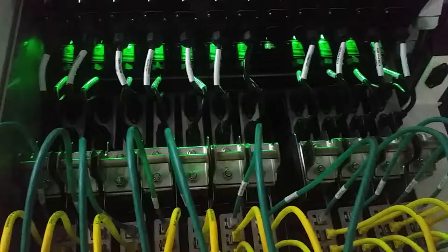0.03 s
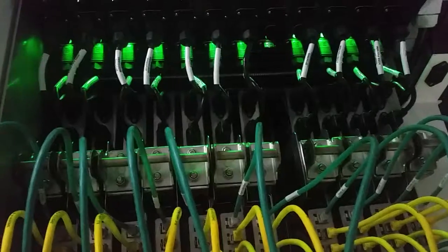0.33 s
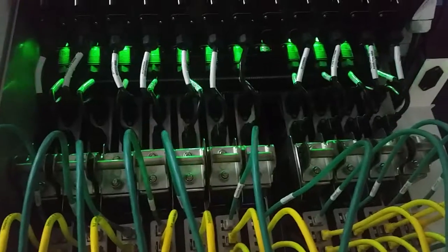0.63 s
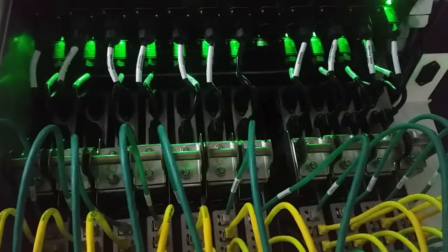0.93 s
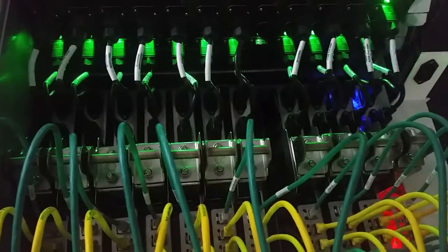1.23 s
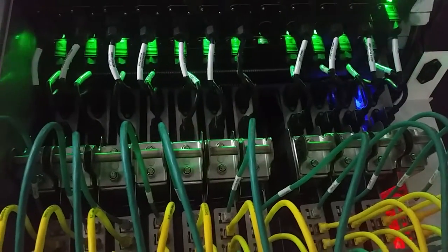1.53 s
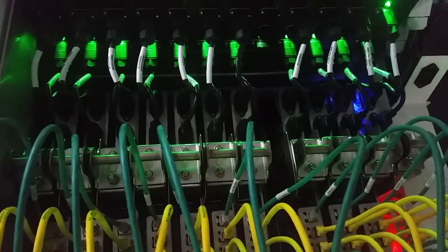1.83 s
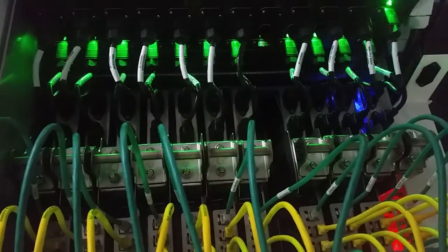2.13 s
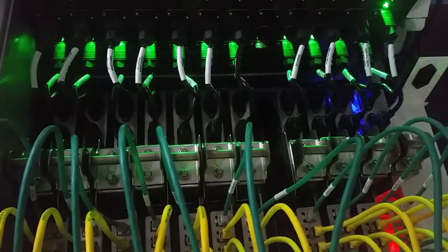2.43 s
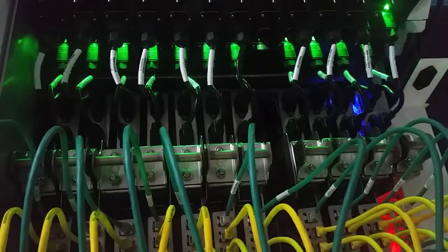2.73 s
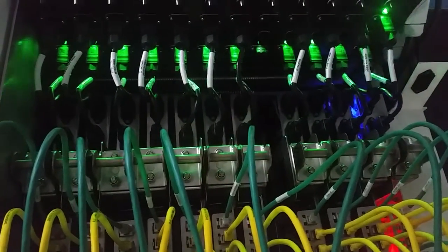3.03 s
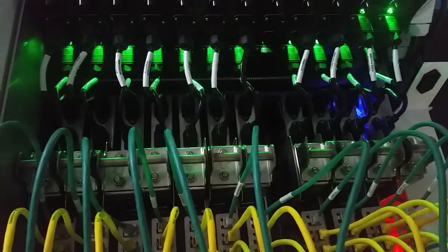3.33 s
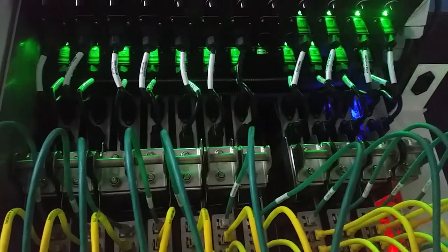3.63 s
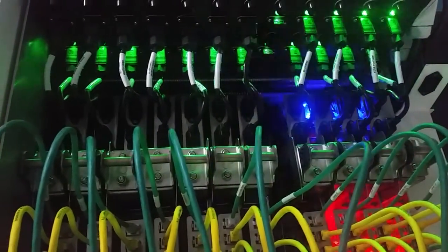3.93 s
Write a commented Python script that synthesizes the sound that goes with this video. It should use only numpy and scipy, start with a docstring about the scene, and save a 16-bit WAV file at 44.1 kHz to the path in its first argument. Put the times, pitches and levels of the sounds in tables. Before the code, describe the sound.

A loud metal clunk of a power switch shakes an equipment cabinet, followed by one relay click and later a quick cluster. The microphone opens with a pop, and server room fans rumble, hiss and whine throughout.

```python
"""Server rack powering up

In a hard-walled server room a heavy contactor slams in, shakes the cabinet and wakes a thin
power-supply whine; small relays clack, one just before it and the rest after. Cooling fans rumble,
hiss and whine throughout. The microphone comes alive with a pop and fades in."""
import sys
import numpy as np
from scipy import signal
from scipy.fft import rfft, irfft, next_fast_len
from scipy.io import wavfile
from scipy.ndimage import map_coordinates

SR = 44100
rng = np.random.default_rng(int(sys.argv[2]) if len(sys.argv) > 2 else 0)


def wav_out(sig):
    """Save sig, one row per channel (or a flat mono array), as 16-bit PCM at SR to the path in sys.argv[1]."""
    wavfile.write(sys.argv[1], SR, np.round(np.clip(np.atleast_2d(sig).T, -1, 1) * 32767).astype(np.int16))


N = 176400  # 4 s


def amp(db):
    """Decibels to gain."""
    return 10 ** (np.asarray(db) / 20)


def unit_rms(x):
    """x scaled to rms 1."""
    return x / np.sqrt(np.mean(x ** 2) + 1e-20)


def curve_at(points, hz):
    """A breakpoint curve read on a log frequency axis."""
    freqs, values = np.transpose(points)
    return np.interp(np.log(hz + 1), np.log(freqs + 1), values)


def since(start):
    """Seconds since start for each sample, zero before it."""
    return np.maximum(np.arange(N) / SR - start, 0)


def pan(db):
    """Left and right gains, db apart; positive leans left."""
    return amp(np.array([[.5], [-.5]]) * db)


def wobble(rate):
    """A smooth random modulator, rate knots a second."""
    return map_coordinates(rng.standard_normal(400), [np.arange(N) * rate / SR], mode="wrap")


def eq(x, response):
    """x filtered by response, a gain for each frequency."""
    size = next_fast_len(N + 8192)
    return irfft(rfft(x, size) * response(np.fft.rfftfreq(size, 1 / SR)), size)[..., :N]


def noise(colour, correlation):
    """Stereo noise of rms 1; the lower the left-right correlation, the wider it sounds."""
    def mid_side_gains(hz):
        width = np.arccos(np.clip(curve_at(correlation, hz), -1, 1)) / 2
        return colour(hz) * np.array([np.cos(width), np.sin(width)])
    mid, side = eq(rng.standard_normal((2, N)), mid_side_gains)
    return unit_rms(np.array([mid + side, mid - side]))


# Colours of the ventilation rumble and the air hiss: f/Hz, relative level/dB
RUMBLE_COLOUR = [(15, -7), (30, -7.5), (42, -5.5), (54, -23), (70, -0.5), (110, 1.5), (135, -6),
                 (156, -1.5), (185, -10.5), (222, -15), (243, -10.5), (290, -15.5), (330, -6.5), (390, -18),
                 (600, -46.5), (1500, -53)]
HISS_COLOUR = [(150, -20), (420, 1), (520, 1.5), (590, 6.5), (660, 3), (740, 5.5), (1100, 0.5),
               (1800, -2.5), (2250, -3.5), (2800, -12.5), (3800, -11.5), (4600, -18.5), (5300, -19.5),
               (6100, -21), (7100, -10.5), (8000, -22), (8800, -22.5), (10300, -46), (12500, -29),
               (16000, -30)]
# Stereo width of the background bed: f/Hz, left-right correlation
BED_CORRELATION = [(30, 1), (110, 1), (250, 0.97), (500, 0.75), (1000, -0.29), (2000, -0.13),
                   (4000, -0.054), (8000, -0.12)]
# Lean of the fan noise: f/Hz, pan/dB
FAN_PAN = [(30, -4), (100, -2), (250, 0.3), (2000, 0.5), (4000, 1.5), (5300, -6), (6300, -4), (7200, 4.5),
           (8700, -5), (12000, 1.5)]
def fan_air():
    """The bed: ventilation rumble and the hiss of air through the racks."""
    rumble = amp(-43) * noise(lambda hz: amp(curve_at(RUMBLE_COLOUR, hz)), BED_CORRELATION)
    hiss = amp(-49.5) * noise(lambda hz: amp(curve_at(HISS_COLOUR, hz)), BED_CORRELATION)
    return eq(rumble + hiss, lambda hz: pan(curve_at(FAN_PAN, hz)))


def whine(partials):
    """Held tones, each wavering slightly in pitch and level."""
    drift_hz, flutter_db, spread_rad = 1.196, 0.6, 0.75
    out = np.zeros((2, N))
    for hz, db, pan_db in partials:
        pitch = hz + drift_hz * wobble(7)
        phase = 2 * np.pi * np.cumsum(pitch) / SR + np.array([[.5], [-.5]]) * spread_rad
        out += pan(pan_db) * amp(db + flutter_db * wobble(9)) * np.sqrt(2) * np.sin(phase)
    return out


# Tones of the fans: f/Hz, level/dB, pan/dB
FAN_PARTIALS = [(111.7, -54, 8.5), (155.7, -57.5, 2), (331, -65.5, 3.5), (435.5, -65, 3), (787, -73, 12),
                (848.6, -67.5, -17.5), (874.8, -52, 1), (1297, -69.5, 10), (1316, -76, 21.5),
                (1700, -61, -1.5), (1766, -71, 10)]
def fan_whine():
    """The running fans hum and whine."""
    return whine(FAN_PARTIALS)


# Whine of the supply: f/Hz, level/dB, pan/dB
SUPPLY_PARTIALS = [(4280, -79, -3), (5135, -78, -6.5)]
# Its narrow sizzle: f/Hz, relative level/dB
SIZZLE_COLOUR = [(3800, -14), (4700, -7), (5300, 0), (5900, -6.5), (6800, -34), (9000, -38)]
def power_supply():
    """A thin whine and sizzle that swell in once the contactor has closed."""
    closed_s, swell_s = CONTACTOR_BLOWS[0][0], 0.14
    sizzle = amp(-70) * pan(-7) * noise(lambda hz: amp(curve_at(SIZZLE_COLOUR, hz)), BED_CORRELATION)
    return (whine(SUPPLY_PARTIALS) + sizzle) * np.minimum(since(closed_s) / swell_s, 1)


# Stereo width of the hits and their reverb: f/Hz, left-right correlation
HIT_CORRELATION = [(100, 1), (400, 0.74), (1000, 0.53), (2500, 0), (15000, 0.012)]
def dense_modes(colour):
    """The vibration of a part with too many modes to tell apart."""
    return noise(lambda hz: amp(curve_at(colour, hz)), HIT_CORRELATION)


def strike(vibration, start, attack, t60):
    """A hit with linear attack and exponential decay (times in s); the envelope sets its energy."""
    t = since(start)
    envelope = np.minimum(t / attack, 1) * amp(-60 * np.maximum(t - attack, 0) / t60)
    return unit_rms(vibration * envelope) * np.sqrt(np.mean(envelope ** 2))


def ringing(modes, start):
    """Damped modes of a struck part; each reaches left and right with its own phase and strength."""
    scatter_db, attack_s = 4, 0.0028
    t, out = since(start), np.zeros((2, N))
    for hz, db, t60 in modes:
        spread = np.arccos(np.clip(curve_at(HIT_CORRELATION, hz), 0, 1))
        phase = 2 * np.pi * rng.random() + spread * np.array([[.5], [-.5]]) * rng.choice([-1, 1])
        level = db + scatter_db * rng.standard_normal((2, 1))
        out += amp(level - 60 * t / t60) * np.sin(2 * np.pi * hz * t + phase)
    return out * np.minimum(t / attack_s, 1)


# Decay of the room: f/Hz, t60/s
ROOM_DECAY = [(100, 3.7), (700, 0.36), (2000, 0.97), (7000, 1.19), (15000, 0.58)]
# Tone of its reverb: f/Hz, gain/dB
ROOM_EQ = [(100, -1), (250, -10), (450, -3.5), (700, -1), (2000, -0.5), (4000, 2), (7000, -3), (15000, 6.5)]
def room(x):
    """Diffuse reverb off the hard walls; each frequency dies at its own speed."""
    build_s = 0.01
    hz, t, bands = signal.stft(rng.standard_normal((2, SR)), SR, nperseg=256)
    decay = amp(-60 * t / curve_at(ROOM_DECAY, hz)[:, None])
    tail = signal.istft(bands * decay * np.minimum(t / build_s, 1), SR, nperseg=256)[1]
    wet = signal.fftconvolve(x, tail / np.linalg.norm(tail[0]), axes=1)[:, :N]
    crossfeed = eq(wet[::-1], lambda hz: np.clip(curve_at(HIT_CORRELATION, hz), 0, 1) ** 2)
    return eq(wet + crossfeed, lambda hz: amp(curve_at(ROOM_EQ, hz)))


# Relay cues: t/s, snap level/dB, knock level/dB, contact ring f/Hz, pan/dB
RELAY_CLACKS = [(0.967, -55, -59, 7000, 3), (1.278, -34, -42.5, 6030, -2), (3.4360, -39.5, -37, 5900, 0),
                (3.5839, -36, -36.5, 5900, -1), (3.7357, -37, -35.5, 7200, 4),
                (3.7531, -33.5, -47, 6150, -5), (3.8679, -34.5, -33, 7100, 1.5),
                (3.9052, -32.5, -50, 6900, -3.5)]
# Colours of the contact snap and the plastic housing: f/Hz, relative level/dB
SNAP_COLOUR = [(1500, -51), (3000, -18.5), (4200, -4), (5000, -4), (5700, 5.5), (7200, 4), (8200, -0.5),
               (9000, -5.5), (10500, -13), (13000, -7.5), (16000, -11)]
HOUSING_COLOUR = [(100, -15), (260, -6.5), (600, -22), (1050, 0), (1280, -12), (1450, -2), (1850, -7),
                  (2500, -13), (3050, -12.5), (3700, -27), (9000, -45)]
# Modes of the housing: f/Hz, relative level/dB, t60/s
HOUSING_RING = [(1038, -6, 0.048), (1386, -8, 0.12), (1840, -3, .035), (2994, -10, 0.044),
                (5500, -11.5, 0.023), (7000, -5, 0.066), (9230, -12, 0.032)]
def relays():
    """Each armature knocks its housing while the contacts snap and ring."""
    ring_width_hz = 1200
    clacks, rings = np.zeros((2, 2, N))
    snap, housing = dense_modes(SNAP_COLOUR), dense_modes(HOUSING_COLOUR)
    for start, snap_db, knock_db, ring_hz, pan_db in RELAY_CLACKS:
        spring = noise(lambda hz: 1 / (1 + (2 * (hz - ring_hz) / ring_width_hz) ** 2), HIT_CORRELATION)
        contacts = strike(snap + amp(-8.5) * spring, start, attack=0.0026, t60=0.023)
        contacts += amp(-12.5) * strike(spring, start, attack=0.0026, t60=0.084)
        knock = strike(housing, start, attack=0.0028, t60=0.097)
        rings += pan(pan_db) * amp(knock_db) * ringing(HOUSING_RING, start)
        clacks += pan(pan_db) * (amp(snap_db) * contacts + amp(knock_db) * knock)
    return clacks + rings + amp(-11) * room(clacks)


# Contactor cues: t/s, slam level/dB, thud level/dB, slam low-pass f/Hz
CONTACTOR_BLOWS = [(1.0512, -29, -40, 15000), (1.123, -36, -34, 3500)]
# Colours of the steel crack, the frame and the cabinet panels: f/Hz, relative level/dB
CRACK_COLOUR = [(200, -21), (1000, -5), (1800, -2), (2900, -7.5), (4000, -10), (4800, -5), (5800, -17),
                (7000, 11), (8300, -26), (10500, -25), (16000, -15)]
FRAME_COLOUR = [(80, -23), (240, 5), (330, -4), (450, 2), (590, -7), (730, 4.5), (1050, -4), (1350, -8),
                (2100, -5), (2600, -15.5), (3000, -16), (4000, -15), (5000, -17), (7100, -6.5),
                (8500, -10.5), (11000, -20), (16000, -27)]
CABINET_COLOUR = [(40, -16), (85, -10), (120, 11.5), (165, -7.5), (230, -17), (330, -31), (700, -41)]
# Modes of the frame: f/Hz, relative level/dB, t60/s
FRAME_RING = [(253, -3, 0.11), (698, -3, 0.087), (840, -16, 0.14), (1207, -11, 0.073), (2080, -16, 0.062),
              (5850, -2, 0.028)]
def contactor():
    """Steel cracks, the frame slams, the cabinet thuds; a softer, duller slam follows as it settles."""
    first_s, first_db = CONTACTOR_BLOWS[0][:2]
    crack = strike(dense_modes(CRACK_COLOUR), first_s, attack=0.0013, t60=0.011)
    metal = amp(-23.5) * pan(-3.5) * crack
    ring = amp(first_db) * ringing(FRAME_RING, first_s)
    cabinet, thud = dense_modes(CABINET_COLOUR), np.zeros((2, N))
    for start, slam_db, thud_db, cutoff_hz in CONTACTOR_BLOWS:
        frame = noise(lambda hz: amp(curve_at(FRAME_COLOUR, hz)) / np.hypot(1, hz / cutoff_hz),
                      HIT_CORRELATION)
        metal += amp(slam_db) * strike(frame, start, attack=0.00083, t60=0.19)
        thud += amp(thud_db) * strike(cabinet, start, attack=0.026, t60=0.27)
    return metal + ring + thud + amp(-3.5) * room(metal)


def scene():
    """The mix: switchgear up front, over the fans and the waking power supply."""
    return contactor() + relays() + fan_air() + fan_whine() + power_supply()


# Swing of the pop, left then right: level/dB, f/Hz, t60/s
POP_SWINGS = [(-18, 520, 0.005), (-21, 153, 0.022)]
def microphone_pop():
    """A tick and a brief damped swing in each channel as the microphone comes alive."""
    start = 0.5165
    t = since(start)
    swings = [-amp(db - 60 * t / t60) * np.sin(2 * np.pi * hz * t) for db, hz, t60 in POP_SWINGS]
    tick = strike(rng.standard_normal((2, N)), start, attack=1 / SR, t60=0.001)
    return np.array(swings) + amp(-36.5) * tick


# Fade-in of the microphone: t/s, gain/dB
FADE_IN = [(0, -81), (.25, -77), (0.408, -62), (0.43, -22), (.5, -10.5), (.6, -4.5), (.72, -0.5), (.9, 0.5),
           (4, 0)]
def record(dry):
    """The microphone fades in with a pop, through a brick-wall high cut."""
    high_cut_hz = 16000
    fade = amp(np.interp(since(0), *np.transpose(FADE_IN)))
    return eq(dry * fade + microphone_pop(), lambda hz: hz < high_cut_hz)


dry = scene()
out = record(dry)
wav_out(out)
```